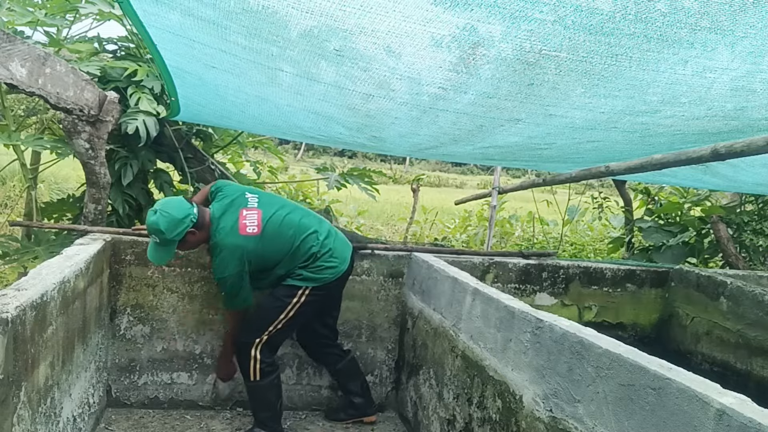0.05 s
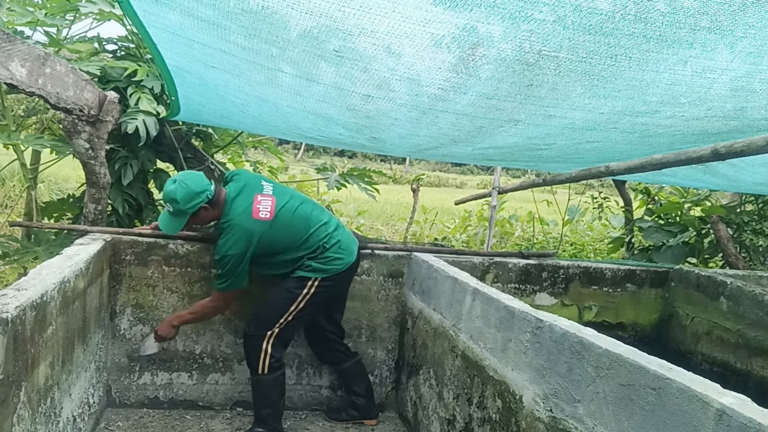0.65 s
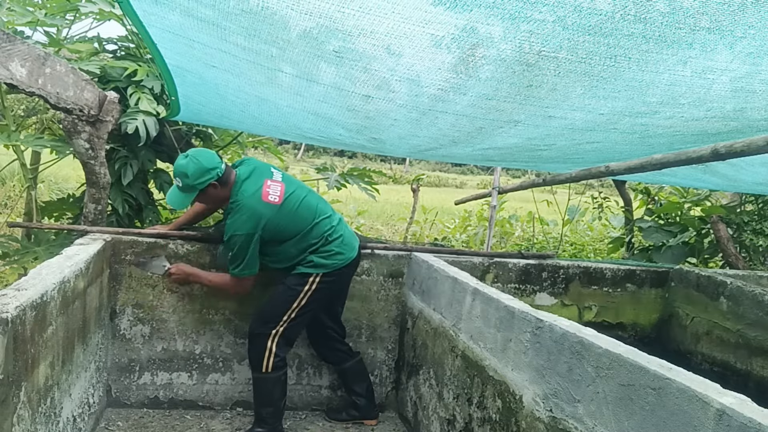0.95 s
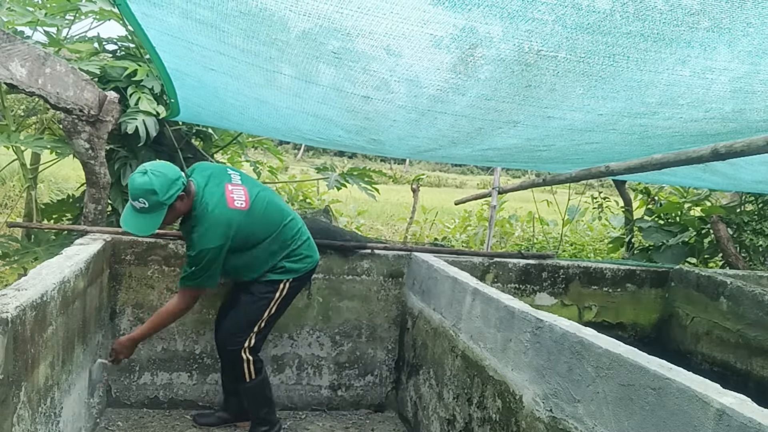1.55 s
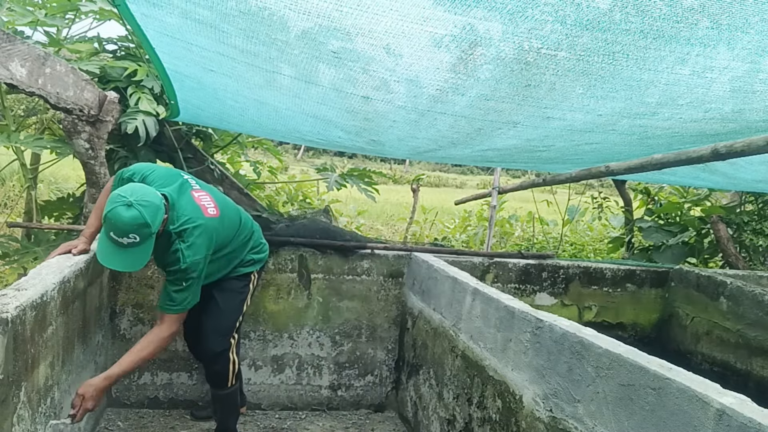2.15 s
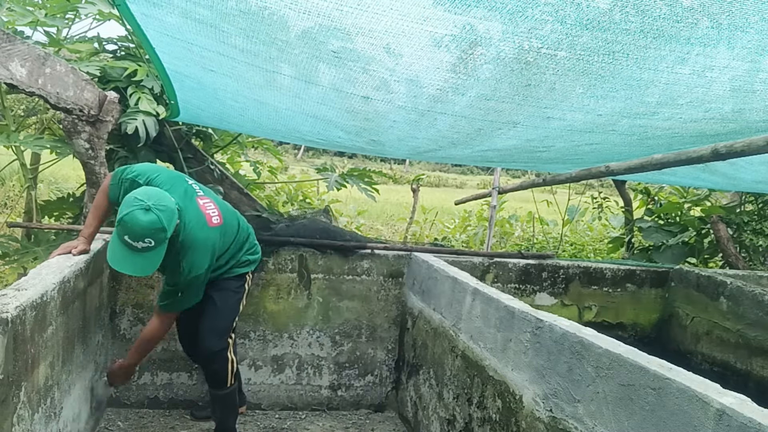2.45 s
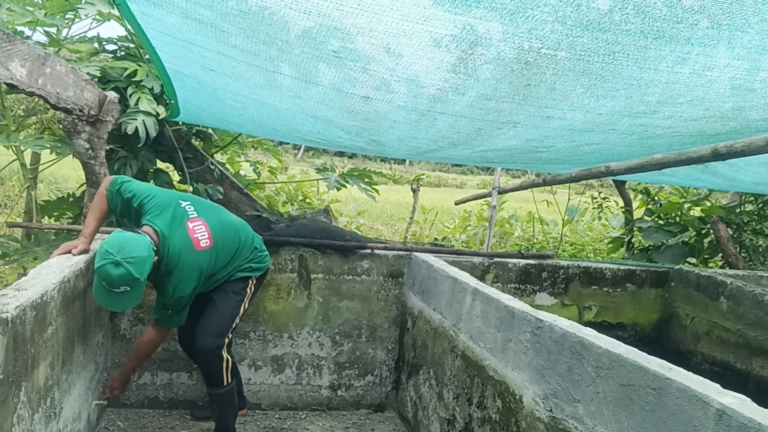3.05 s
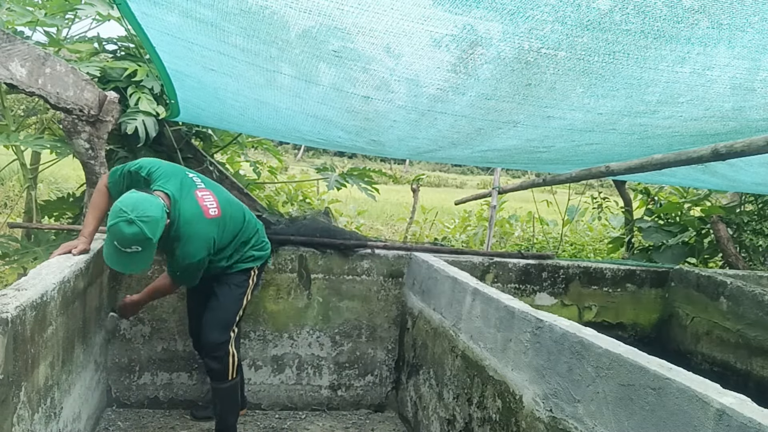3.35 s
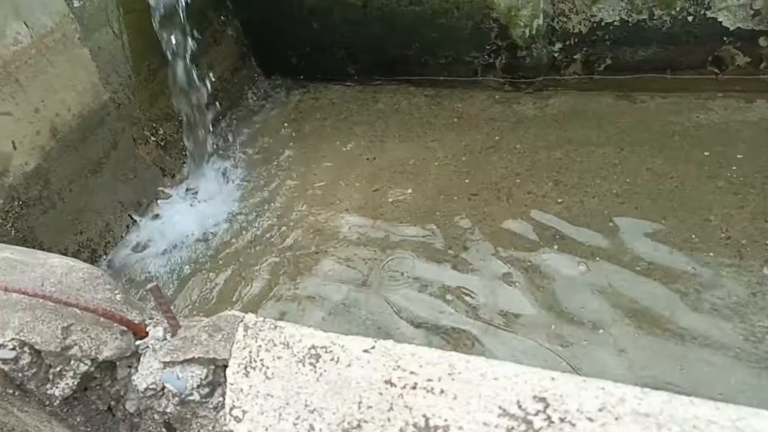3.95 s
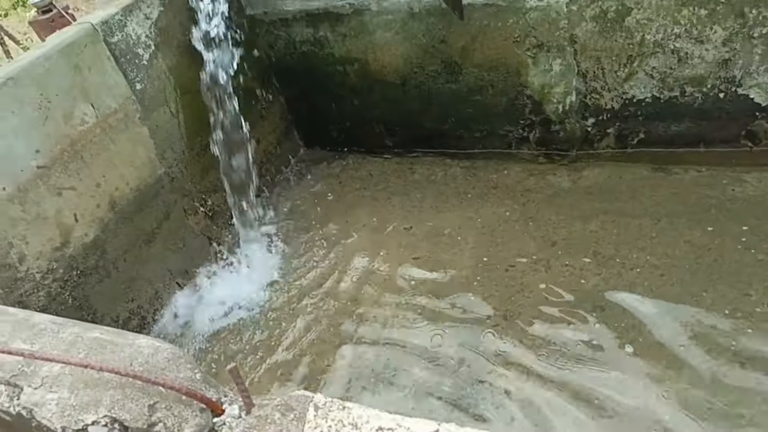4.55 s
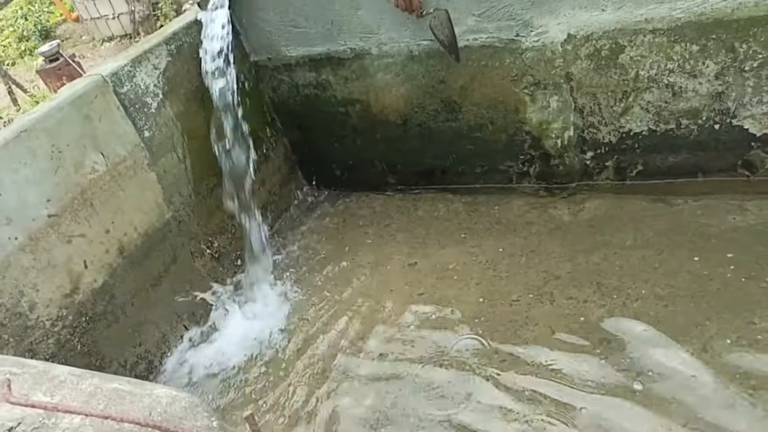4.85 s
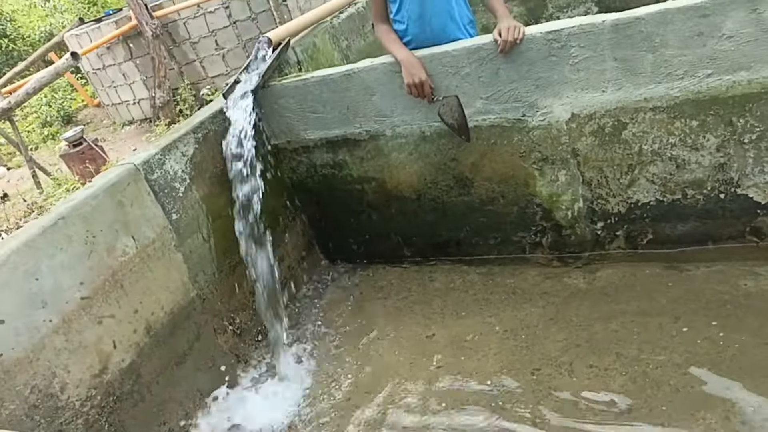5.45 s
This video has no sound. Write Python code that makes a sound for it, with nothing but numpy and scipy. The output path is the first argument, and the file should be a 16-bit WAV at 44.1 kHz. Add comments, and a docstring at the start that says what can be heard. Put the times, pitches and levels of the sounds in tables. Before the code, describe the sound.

Short gritty scrapes of steel on concrete give way to a steady splashing stream of water, with a small engine chugging behind it.

```python
"""A steel scraper rasps in short strokes over the walls of an empty concrete pond, dragging or lifting
between them. Stick-slip friction snaps grit under its edge and excites the modes of the blade and of
the space between the walls. Then the scene changes to a stream falling from a pipe into shallow water,
where drops spatter and trapped air rings as bubbles. Behind it thuds a slow one-cylinder pump engine,
each firing exciting its exhaust pipe. Near the end come a brief trowel scrape and one sharp clack."""
import sys
import numpy as np
from scipy import signal
from scipy.fft import rfft, irfft
from scipy.io import wavfile
from scipy.ndimage import uniform_filter1d

SR = 44100
rng = np.random.default_rng(int(sys.argv[2]) if len(sys.argv) > 2 else 0)


def wav_out(sig):
    """Save sig, one row per channel (or a flat mono array), as 16-bit PCM at SR to the path in sys.argv[1]."""
    wavfile.write(sys.argv[1], SR, np.round(np.clip(np.atleast_2d(sig).T, -1, 1) * 32767).astype(np.int16))


N = 242544
TIME = np.arange(N) / SR
BINS = np.fft.rfftfreq(N, 1 / SR)

# scraper strokes: start_s, end_s, force_db, growth_db, sand_db, dig_db (the last two relative to force)
STROKES = [(-0.005, 0.078, -30, 1, 4.5, -11.5), (0.134, 0.229, -28.5, 8, -1, -14.5),
           (0.256, 0.337, -27, 0, -1, -15.5), (0.463, 0.625, -26.5, -2, -4, -15),
           (0.645, 0.703, -24.5, 4.5, -2.5, -21), (0.725, 0.82, -26.5, -6.5, -3.5, -13),
           (0.862, 0.927, -30.5, -6, 5.5, -21), (0.939, 1.009, -30, 14, 2.5, -14.5),
           (1.019, 1.063, -24.5, -1, -9, -15.5), (1.073, 1.15, -28.5, -19, 0, -12),
           (1.147, 1.193, -27, 0, 0, -17), (1.205, 1.268, -28, -10.5, -0.5, -13),
           (1.378, 1.454, -27, 6, -0.5, -15.5), (1.45, 1.512, -38.5, 10, 8.5, -3),
           (1.551, 1.658, -33, 11.5, 2.5, -8.5), (1.702, 1.793, -38, -3, -13, -2.5),
           (1.752, 1.833, -23, 0, -10.5, -17.5), (1.854, 1.877, -27, -1, -6, 2),
           (2.1, 2.108, -20, -14, -7, -10), (2.143, 2.172, -19.5, -11, -6.5, -32),
           (2.193, 2.222, -37.5, 16, 5.5, -12), (2.302, 2.46, -26.5, 10.5, -6, -12.5),
           (2.55, 2.613, -34, 6, -10, 0.5), (2.628, 2.663, -35.5, 0, -10, 3.5),
           (2.754, 2.877, -27.5, 6, -3.5, -19.5), (2.937, 2.953, -30.5, -8, -4, -2.5),
           (2.971, 3.03, -24.5, -4, -6.5, -20), (3.064, 3.198, -29, 4.5, -2.5, -12),
           (3.243, 3.335, -26.5, 1.5, -9.5, -6.5), (3.333, 3.437, -28.5, 9.5, -1.5, -10.5),
           (3.489, 3.586, -31, -11.5, 1, -11.5), (3.595, 3.672, -26.5, 0.5, -0.5, -9.5),
           (3.706, 3.753, -38, -17, -3.5, -5)]
# blade modes, damped by the wall: pitch_hz, width_hz, back_wall_db, side_wall_db
BLADE_MODES = [(1780, 264, -3, 7.5), (3136, 102, 20, 21.5), (4900, 130, 19.5, 17), (5510, 110, 12.5, 14),
               (5947, 148, 10, 19), (8665, 94, 13.5, 16.5), (10670, 210, 4.5, 8), (11760, 380, 7.5, 10)]
# modes of the whole tool: pitch_hz, level_db, t60_s, exciting_blow
TOOL_MODES = [(438, 1, 0.17, "knock"), (568, 3, 0.2, "press"), (2220, -3, 0.25, "flick"),
              (2246, 2, 0.25, "flick")]
# spectrum of the splash under the pipe: frequency_hz, density_db
SPLASH_SPECTRUM = [(30, -50), (100, -11), (200, -1), (420, -6), (780, -0.5), (1020, -4), (1230, -2.5),
                   (1500, -1), (1700, -5), (1900, -0.5), (2300, -4), (4800, -8.5), (7600, -17.5),
                   (10200, -22), (12500, -15.5), (14000, -19.5)]
# envelope of the stream: time_s, level_db
FLOW = [(3.885, -102), (3.91, -41.5), (3.95, -32), (4.03, -24), (5.5, -24)]

WATER_START_S = FLOW[0][0]
TURN_S = 1.2  # the work moves from the back wall to the side wall
LIFT_GAP_S = 0.066  # across a shorter gap the edge stays on the wall


def amp(db):
    """Converts decibels to an amplitude ratio."""
    return 10 ** (np.asarray(db) / 20)


def unit_rms(x):
    """Normalises x to rms 1."""
    return x / np.sqrt(np.mean(x ** 2) + 1e-20)


def levelled(x, size=1100):
    """Dividing by the running rms removes slow swells and leaves the fast grain."""
    return x / np.sqrt(abs(uniform_filter1d(x ** 2, size)) + 1e-20)


def curve_at(points, hz):
    """Interpolates a table on a log-frequency axis."""
    f, value = np.transpose(points)
    return np.interp(np.log(hz + 1), np.log(f + 1), value)


def filtered(x, gain):
    """Zero-phase filtering by a gain for each frequency."""
    return irfft(rfft(x) * gain, N)


def low_pass(edge_hz, slope=8):
    """Low-pass gain for each frequency, one half at the edge."""
    return 1 / (1 + (BINS / edge_hz) ** slope)


def add(mix, s, sound):
    """Superposes a sound on the mix at time s."""
    part = mix[max(round(s * SR), 0):][:len(sound)]
    part += sound[:len(part)]


def drift(rate_hz, size=8192):
    """Random modulation of rms 1, up to about the given rate."""
    return unit_rms(np.interp(2 * rate_hz * TIME + rng.random(), np.arange(size), rng.standard_normal(size)))


def clicks(per_s, spread_db):
    """A Poisson train of impulses; the spread makes a few of them large."""
    impulses = (rng.random(N) < per_s / SR) * rng.choice([-1, 1], N)
    return impulses * amp(spread_db * np.minimum(rng.exponential(1, N), 4))


def resonate(x, hz, width_hz):
    """A resonator of gain 1 whose centre frequency may vary in time."""
    carrier = np.exp(2j * np.pi * np.cumsum(hz * np.ones(len(x))) / SR)
    pole = np.exp(-np.pi * width_hz / SR)
    return 2 * (carrier * signal.lfilter([1 - pole], [1, -pole], x * carrier.conj())).real


def ring(modes):
    """Free vibration: one exponentially damped sine for each mode."""
    t = TIME[:SR // 2]
    return sum(amp(db) * np.exp(-np.log(1000) * t / t60) * np.sin(2 * np.pi * hz * t)
               for hz, db, t60 in modes)


def patchy(x, depth_db, size=512):
    """Spectral modulation: narrow bands rise and fall at random for a few hundredths of a second."""
    frames = dict(nperseg=size, noverlap=size * 3 // 4)
    spectra = signal.stft(x, **frames)[2]
    patches = rng.standard_normal(spectra.shape)
    for _ in range(2):
        patches = uniform_filter1d(uniform_filter1d(patches, size=3, axis=0), size=6, axis=1)
    gain = amp(depth_db * np.clip(unit_rms(patches), -2, 2))
    return signal.istft(spectra * gain, **frames)[1][:N]


def rasp(grains_per_s=9000, slip_db=2.0, slip_hz=110, wander_db=8.0, wander_hz=22, bend=0.018):
    """Stick-slip friction breaks grains in clumps; the roaming contact favours and bends blade modes."""
    # spectrum of crumbling grit: frequency_hz, density_db
    grit_spectrum = [(60, -36.5), (150, -13), (500, -11), (1500, -3.5), (2500, 6), (4000, 7.5), (7000, -7),
                     (10000, -9.5), (13000, -17), (15500, -20.5)]
    grains = clicks(grains_per_s, spread_db=3.0)
    out = grains.copy()
    for hz, width, back_db, side_db in BLADE_MODES:
        mode_db = np.where(TIME < TURN_S, back_db, side_db) + wander_db * np.tanh(drift(wander_hz))
        out += resonate(grains * amp(mode_db), hz * (1 + bend * drift(wander_hz)), width)
    out = patchy(out, depth_db=3.1)  # every stone under the edge has its own colour
    out = patchy(out, depth_db=3.1, size=1024)  # finer peaks and dips shift as the tool moves
    return filtered(out * amp(slip_db * drift(slip_hz)), amp(curve_at(grit_spectrum, BINS)))


def dragging(size=441):
    """Sliding contact: 1 while the edge drags back between two close strokes, else 0."""
    contact = np.zeros(N)
    for (_, end, *_), (start, *_) in zip(STROKES, STROKES[1:]):
        contact[(TIME > end) & (TIME < start)] = start - end < LIFT_GAP_S
    return abs(uniform_filter1d(contact, size))


def scraper(land_s=0.016, pick_up_s=0.015, release_s=0.0083, coarse_db=-9.5, body_db=-0.5,
            fizz_arch_db=7.5, coarse_hz=1400, fizz_hz=7000):
    """Friction noise follows force: digging gives the low band, sand a fizz that grows with speed."""
    # band levels of the lightly dragged edge: coarse_db, body_db, fizz_db
    drag_db = (-59, -44.5, -53)
    power = np.zeros((3, N))
    last_end = -np.inf
    for start, end, force_db, growth_db, sand_db, dig_db in STROKES:
        rise_s = pick_up_s if start - last_end < LIFT_GAP_S else land_s
        last_end = end
        t = np.arange(-rise_s, end - start + 10 * release_s, 1 / SR)
        along = np.clip(t / (end - start), 0, 1)
        speed = np.sin(np.pi * along) - 2 / np.pi  # about its mean
        bite = np.clip(.5 + t / (2 * rise_s), 0, 1) ** 2
        release = np.exp(-np.maximum(t - end + start, 0) / release_s)
        force = bite * release * amp(force_db + growth_db * (along - .5))
        levels = (dig_db + coarse_db, body_db, sand_db + fizz_arch_db * speed)
        for band, db in zip(power, levels):
            add(band, start - rise_s, (force * amp(db)) ** 2)
    power += amp(drag_db)[:, None] ** 2 * dragging()
    coarse, fizz = low_pass(coarse_hz), 1 - low_pass(fizz_hz, slope=12)
    bands = (coarse, 1 - coarse - fizz, fizz)
    steady = rasp()
    return sum(np.sqrt(p) * levelled(filtered(steady, band)) for p, band in zip(power, bands))


def bass_shelf(x, edge_hz=580):
    """A time-varying shelf filter: the bass is thin during the first strokes."""
    # bass of the rasp: time_s, gain_db
    bass_gain = [(0.9, -48), (1.05, -7), (3.7, -0.5)]
    bass = filtered(x, low_pass(edge_hz))
    return x - bass + bass * amp(np.interp(TIME, *np.transpose(bass_gain)))


def hollow_resonance(x, width_hz=32, tool_db=-5, grip_damping=3.0, roam_db=7.0, roam_hz=14):
    """Forced resonance of the space between the walls and, on the side wall, of the hand-damped tool."""
    # modes between the concrete walls: pitch_hz, back_wall_db, side_wall_db
    hollow_modes = [(675, -0.5, -3), (848, -6.5, 4), (1175, 0.5, -8.5), (1570, 5, 3), (1786, 3.5, 3.5),
                    (2214, 0, 2)]
    on_side = TIME > TURN_S
    modes = [(hz, width_hz, amp(np.where(on_side, side_db, back_db)))
             for hz, back_db, side_db in hollow_modes]
    modes += [(hz, grip_damping * np.log(1000) / np.pi / t60, on_side * amp(tool_db + db))
              for hz, db, t60, blow in TOOL_MODES if blow != "flick"]
    # each mode swells and fades as the tool moves along the wall
    return x + sum(resonate(x * gain * amp(roam_db * np.tanh(drift(roam_hz))), hz, width)
                   for hz, width, gain in modes)


def crumbs(level_db=-25, per_s=2500, spread_db=4.0, low_hz=900, trickle_s=0.022):
    """Shot noise of many tiny impacts: loosened grit trickles down the wall with every stroke."""
    loosened = sum(amp(2 * force_db) * ((TIME > start) & (TIME < end))
                   for start, end, force_db, *_ in STROKES)
    pole = np.exp(-1 / (trickle_s * SR))
    falling = np.sqrt(signal.lfilter([1 - pole], [1, -pole], loosened))
    colour = BINS ** 4 / (BINS ** 4 + low_hz ** 4) / np.sqrt(BINS + low_hz)
    return amp(level_db) * falling * unit_rms(filtered(clicks(per_s, spread_db), colour))


def air(level_db=-67):
    """Ambient noise: a very quiet, steady outdoor background."""
    # spectrum of still air outdoors: frequency_hz, density_db
    air_spectrum = [(90, -16.5), (200, -3), (950, -8), (2000, -7), (15000, -23)]
    return amp(level_db) * unit_rms(filtered(rng.standard_normal(N), amp(curve_at(air_spectrum, BINS))))


def pond_reverb(x, delay_s=0.004):
    """Reverberation: dense reflections between concrete walls, lasting longest in the midrange."""
    # decay of the empty pond: frequency_hz, t60_s
    decay_times = [(400, .17), (1000, .5), (2500, .24), (15000, .15)]
    reflections = rng.standard_normal(SR // 2) * (TIME[:SR // 2] > delay_s)
    hz, t, spectra = signal.stft(reflections, SR, nperseg=256)
    decay = np.exp(-np.log(1000) * t / curve_at(decay_times, hz)[:, None])
    tail = signal.istft(spectra * decay, SR, nperseg=256)[1]
    return signal.fftconvolve(x, tail / np.linalg.norm(tail))[:N]


def squeaks(length_s=0.034, jitter=.07, jitter_hz=500, rough_db=4.0, low_hz=950):
    """Stick-slip oscillation: for a moment the slips are nearly periodic and give a rough tone."""
    # chatter of the edge: middle_s, pitch_hz, level_db
    chatters = [(0.024, 1209, -39), (0.167, 4900, -20), (0.325, 4677, -26), (0.375, 4650, -35.5),
                (0.745, 3005, -21.5), (1.795, 3061, -20), (2.847, 1750, -30.5), (2.883, 2299, -29),
                (2.937, 2624, -30), (3.145, 1780, -31), (3.405, 1792, -28), (3.436, 2190, -25)]
    pitch, level = np.zeros((2, N))
    for s, hz, db in chatters:
        on = abs(TIME - s) < length_s / 2
        pitch[on] = hz
        level[on] = amp(db) * np.cos(np.pi * (TIME[on] - s) / length_s)
    cycles = np.cumsum(pitch * (1 + jitter * drift(jitter_hz))) / SR
    tone = unit_rms(np.sin(2 * np.pi * cycles) * amp(rough_db * drift(jitter_hz)))
    return filtered(level * tone, 1 - low_pass(low_hz))


def catches(ring_factor=5.2, crunch_db=-7, crunch_s=0.0028, touch_s=0.0015, soft_db_per_octave=-7,
            low_hz=1100):
    """Impacts excite the blade: a hard tick cracks grit too, a light touch favours the lower modes."""
    # the edge lands or catches on a stone: time_s, level_db, kind ("tick" or "touch")
    impacts = [(0.156, -21, "tick"), (0.435, -26, "touch"), (0.455, -13, "tick"), (0.508, -12, "touch"),
               (1.367, -20, "touch"), (1.6, -15.5, "touch"), (1.634, -18.5, "tick"),
               (1.772, -14.5, "touch"), (2.066, -36, "touch"), (2.093, -15, "tick"), (2.19, -17.5, "tick"),
               (2.551, -18.5, "tick"), (2.565, -14, "tick"), (2.595, -14.5, "tick"), (2.642, -17.5, "tick"),
               (2.732, -26.5, "touch"), (2.772, -14, "tick"), (2.932, -17, "touch"), (2.958, -12, "touch"),
               (2.978, -21, "touch"), (3.278, -13.5, "touch"), (3.645, -12, "touch")]
    out, t = np.zeros(N), TIME[:SR // 2]
    for s, db, kind in impacts:
        hard = kind == "tick"
        tilt_db = 0 if hard else soft_db_per_octave
        blade = ring([(hz, mode_db + tilt_db * np.log2(hz / BLADE_MODES[0][0]), ring_factor / width)
                      for hz, width, _, mode_db in BLADE_MODES])
        blade *= 1 if hard else 1 - np.exp(-t / touch_s)
        crunch = hard * rng.standard_normal(len(t)) * np.exp(-t / crunch_s)
        add(out, s, amp(db) * (blade / abs(blade).max() + amp(crunch_db) * crunch))
    return signal.sosfilt(signal.butter(3, low_hz, "high", fs=SR, output="sos"), out)


def springs(swell_s=0.009, chatter_db=2.0, chatter_hz=55, buzz=0.3):
    """Free vibration: the bent tool springs back and chatters on the wall; two close modes beat."""
    # blows to the tool: time_s, kind ("knock", "press" or "flick"), level_db
    blows = [(1.57, "knock", -35), (1.868, "knock", -30.5), (2.14, "press", -45), (2.165, "knock", -40.5),
             (2.47, "flick", -28.5), (2.565, "knock", -35.5), (2.65, "knock", -33.5),
             (2.772, "knock", -34.5), (2.79, "press", -39), (3.075, "press", -43), (3.715, "flick", -33.5)]
    out = np.zeros(N)
    swell = 1 - np.exp(-TIME[:SR // 2] / swell_s)
    for s, blow, db in blows:
        modes = [mode for *mode, kind in TOOL_MODES if kind == blow]
        add(out, s - swell_s / 2, amp(db) * swell * ring(modes))
    return out * amp(chatter_db * drift(chatter_hz)) * (1 + buzz * drift(2 * chatter_hz))


def boots(from_hz=145, to_hz=215, width_hz=22):
    """A flexing rubber boot creaks dully: narrow-band noise whose pitch rises under load."""
    # boots shift on the floor: start_s, level_db, length_s
    shuffles = [(3.034, -57.5, 0.05), (3.392, -56.5, 0.39)]
    level, pitch = np.zeros((2, N))
    for s, db, length in shuffles:
        window = signal.windows.tukey(int(length * SR), .5)
        add(level, s, amp(db) * window)
        add(pitch, s, np.linspace(from_hz, to_hz, len(window)))
    pitch = np.maximum(pitch, from_hz)
    creak = resonate(resonate(rng.standard_normal(N), pitch, width_hz), pitch, width_hz)
    return level * levelled(creak)


def bubbles(per_s=1500, decay_cycles=11, rise=0.0615, sizes=48):
    """Bubble resonance: air dragged under by the stream pulsates, each bubble rising a little in pitch."""
    out = np.zeros(N)
    for hz in np.geomspace(330, 6500, sizes) * rng.uniform(1.0, 1.03, sizes):
        age = np.arange(int(5 * decay_cycles * SR / hz)) * hz / SR / decay_cycles  # in time constants
        blip = np.exp(-age) * np.sin(2 * np.pi * decay_cycles * age * (1 + rise * age / 2))
        births = clicks(per_s / sizes * np.sqrt(hz / 1500), spread_db=0)
        gain = amp(curve_at(SPLASH_SPECTRUM, hz)) * np.sqrt(hz)
        out += gain * unit_rms(signal.oaconvolve(births, blip)[:N])
    return unit_rms(out)


def high_hiss(flutter, gain_db=-15, centre_hz=15120, width_hz=600):
    """Narrow-band noise: a thin, very high hiss, separate from the water's sound."""
    band = np.exp(-((BINS - centre_hz) / width_hz) ** 2)
    return amp(gain_db) * unit_rms(filtered(rng.standard_normal(N) * flutter, band))


def stream_and_hiss(splash_db=-3.5, bubble_db=-5, lump_db=1.33, lump_hz=60, cavity_db=-12, cavity_hz=1280):
    """Impact noise of water landing in lumps, with bubbles and a wobbling resonant hollow."""
    lumps = amp(lump_db * drift(lump_hz))
    drops = patchy(clicks(per_s=16000, spread_db=1.5), depth_db=2.4)
    splash = unit_rms(filtered(drops * lumps, amp(curve_at(SPLASH_SPECTRUM, BINS))))
    hiss = high_hiss(lumps)  # a separate layer under the same envelope
    cavity = unit_rms(resonate(splash, cavity_hz * (1 + .09 * drift(rate_hz=14)), width_hz=60))
    water = amp(cavity_db) * cavity + amp(splash_db) * splash + amp(bubble_db) * bubbles()
    return (water + hiss) * amp(np.interp(TIME, *np.transpose(FLOW))) * (TIME > WATER_START_S)


def pump(first_s=3.9535, firings_per_s=14.63, level_db=-27, uneven_db=1.0, attack_s=0.002, low_hz=64):
    """Pipe resonance: each firing thumps the exhaust and echoes from nearby walls."""
    # exhaust pipe modes: pitch_hz, level_db, t60_s
    exhaust_modes = [(88, -10.5, 0.19), (148.7, 10.5, 0.053), (185, -11, 0.012), (272, -4.5, 0.14)]
    # direct sound and echo: delay_s, gain
    paths = [(0, 0.7), (0.021, 0.28)]
    out = np.zeros(N)
    thump = ring(exhaust_modes) * (1 - np.exp(-TIME[:SR // 2] / attack_s))
    for s in np.arange(first_s, TIME[-1], 1 / firings_per_s):
        strength = amp(level_db + uneven_db * rng.standard_normal())
        for delay, gain in paths:
            add(out, s + delay, strength * gain * thump)
    fade_in = amp(np.interp(TIME, *np.transpose(FLOW)) - FLOW[-1][1])
    return signal.sosfilt(signal.butter(5, low_hz, "high", fs=SR, output="sos"), out) * fade_in


def slaps_and_scrape(swell_s=0.011, width_share=0.51):
    """Band-pass noise bursts: slaps of water and, just before the clack, a brief bright trowel scrape."""
    # water slaps, and the scrape at 3200 Hz: start_s, pitch_hz, level_db
    bursts = [(4.206, 1090, -25.5), (4.236, 820, -23), (4.479, 940, -27.5), (4.575, 2080, -24.5),
              (4.676, 1570, -25), (5.288, 3200, -24.5), (5.434, 1310, -28)]
    out, t = np.zeros(N), TIME[:SR // 10]
    envelope = t / swell_s * np.exp(1 - t / swell_s)
    for s, hz, db in bursts:
        width_hz = width_share * hz
        burst = resonate(resonate(rng.standard_normal(len(t)), hz, width_hz), hz, width_hz)
        add(out, s, amp(db) * levelled(burst) * envelope)
    return out


def gulps():
    """Bubble resonance: a large pocket of air rings as one damped sine."""
    # large bubbles: start_s, pitch_hz, level_db, t60_s
    large_bubbles = [(4.235, 778, -21.5, 0.38), (4.625, 618, -23.5, 0.16), (5.255, 328, -25, 0.19)]
    out = np.zeros(N)
    for s, hz, db, t60 in large_bubbles:
        add(out, s, ring([(hz, db, t60)]) * (1 - np.exp(-TIME[:SR // 2] * hz)))
    return out


def clack(start_s=5.3755, level_db=-12.5, wet_db=-5, swell_s=0.0013):
    """A hard tap beside the water excites heavily damped modes, reflected by the pond walls."""
    # modes of the clack: pitch_hz, level_db, t60_s
    clack_modes = [(1674, 2, 0.027), (2740, 4.5, 0.012), (2930, 14.5, 0.0096), (3540, 5.2, 0.028)]
    out = np.zeros(N)
    add(out, start_s, amp(level_db) * ring(clack_modes) * (1 - np.exp(-TIME[:SR // 2] / swell_s)))
    return out + amp(wet_db) * pond_reverb(out)


def scene(wet_db=-13, fade_s=0.06):
    """Superposition of the sources: the reverberant scraping fades out just before the water comes in."""
    work = hollow_resonance(bass_shelf(scraper())) + catches() + squeaks() + springs() + crumbs() + boots()
    fade_out = np.clip((WATER_START_S - TIME) / fade_s, 0, 1)
    scraping = (work + amp(wet_db) * pond_reverb(work)) * fade_out
    return (scraping + stream_and_hiss() + slaps_and_scrape() + gulps() + clack() + pump() + air())[None]


def record(dry, edge_hz=15550):
    """Band limiting: a steep low-pass filter removes the highest treble."""
    kernel = signal.firwin(401, edge_hz, window=("kaiser", 9), fs=SR)
    return signal.oaconvolve(dry, kernel[None], "same")


dry = scene()
out = record(dry)
wav_out(out)
```